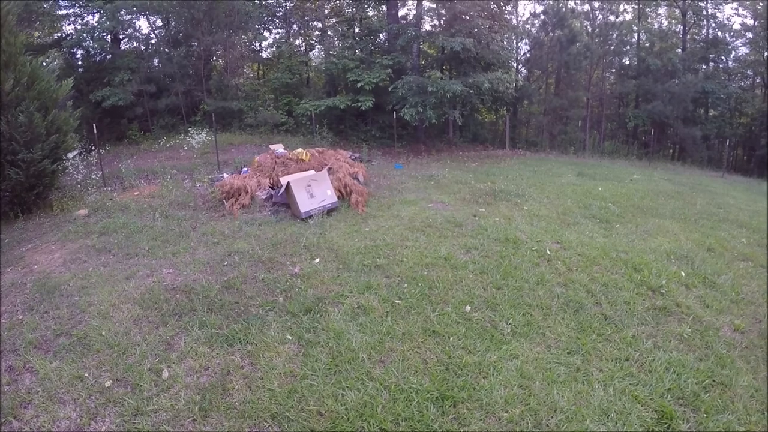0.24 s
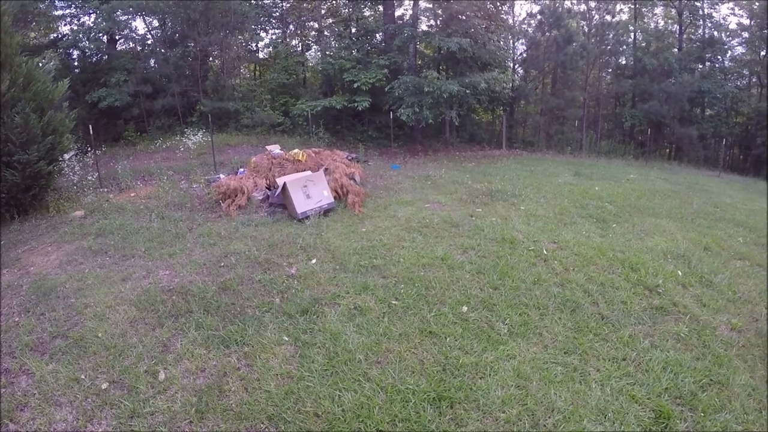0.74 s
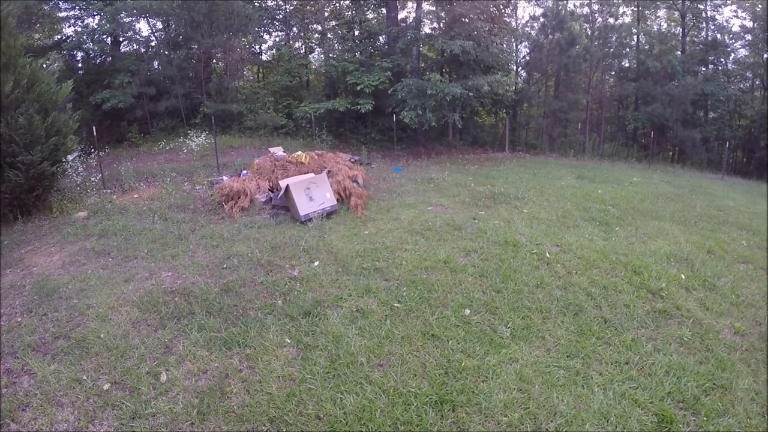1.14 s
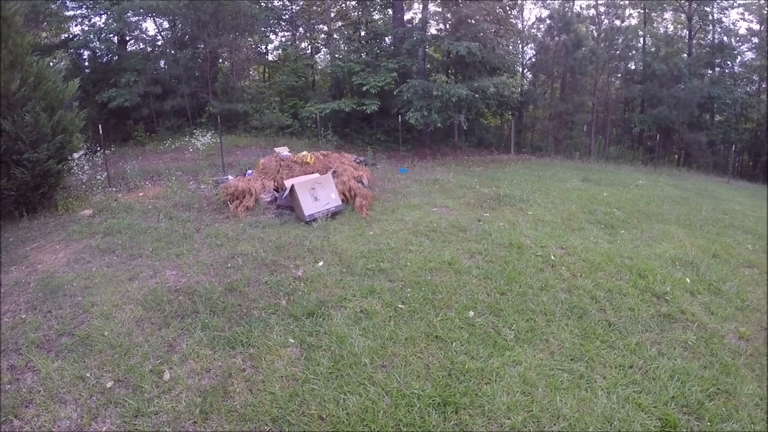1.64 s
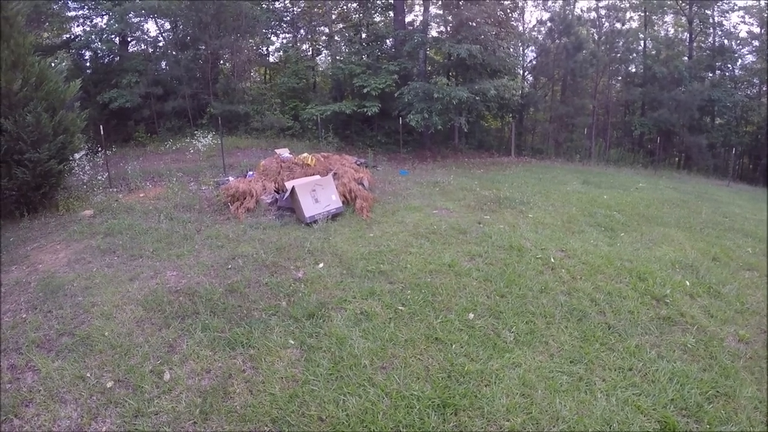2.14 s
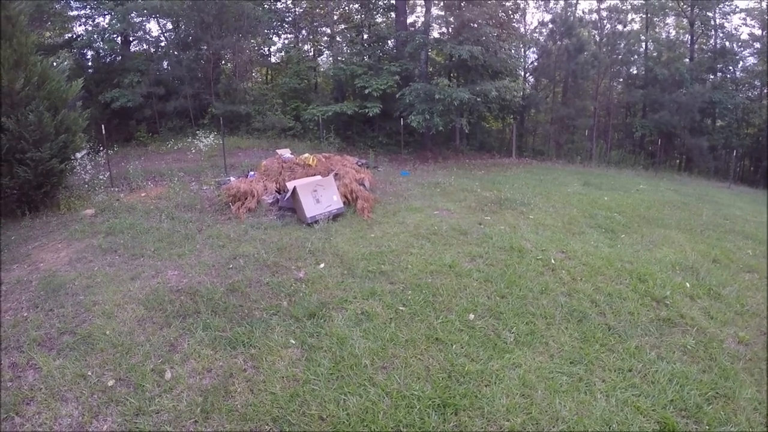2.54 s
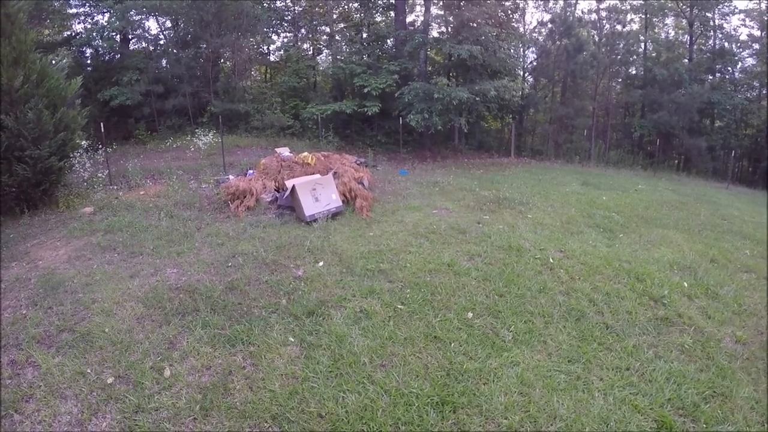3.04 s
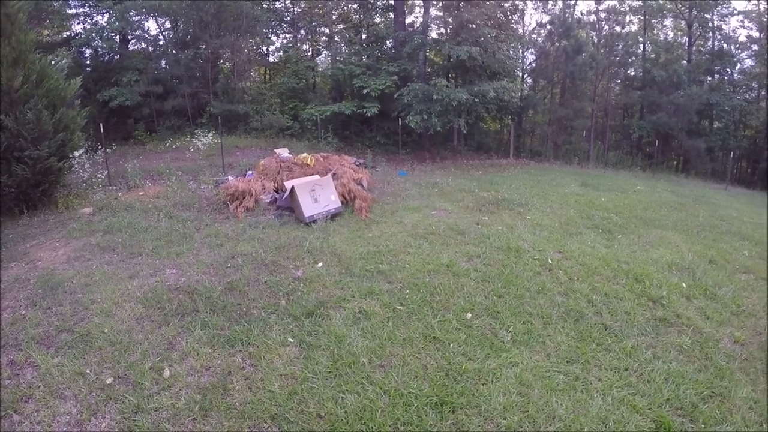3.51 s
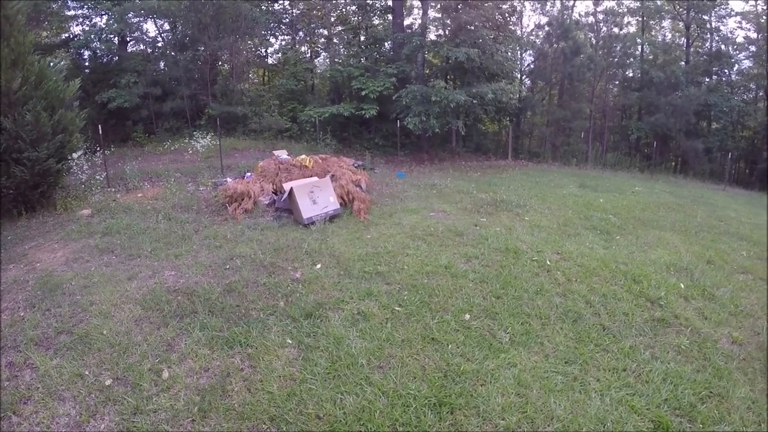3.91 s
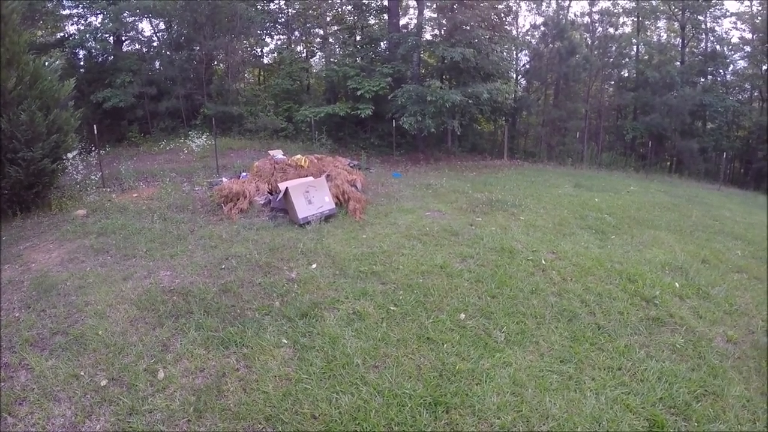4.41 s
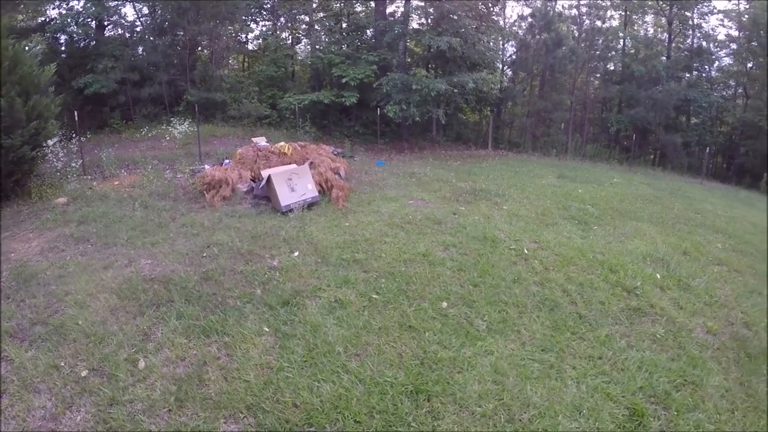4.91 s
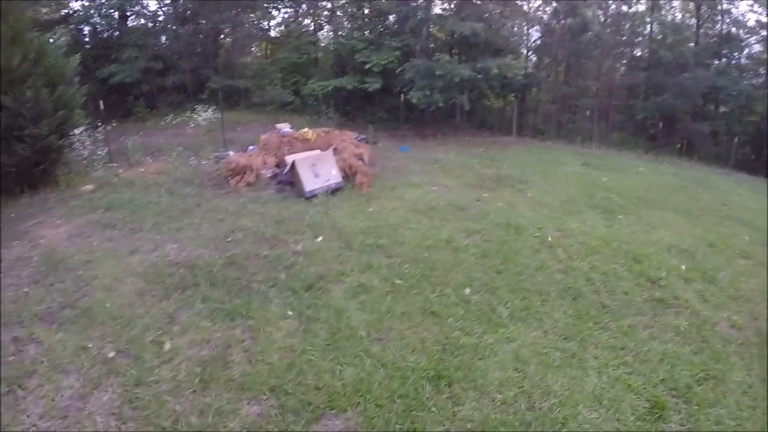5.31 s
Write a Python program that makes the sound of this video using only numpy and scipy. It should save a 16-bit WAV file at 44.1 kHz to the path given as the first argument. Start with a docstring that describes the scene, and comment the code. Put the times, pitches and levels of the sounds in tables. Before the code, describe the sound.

Three automatic airsoft bursts crack across a lawn, gears whirring and pellets smacking cardboard, ending in hollow dry firing.

```python
"""An electric airsoft rifle fires three automatic bursts, 13 shots a second, across a tree-edged lawn.
Its piston slams home with a crack; motor and gears whir between shots. Each pellet smacks a cardboard
target some 55 ms later and the trees scatter an echo. The last burst runs dry and ends in hollow pops
of air. Then the shooter's gear rustles while a far engine hums."""
import sys
import numpy as np
from scipy import signal
from scipy.fft import rfft, irfft, next_fast_len
from scipy.io import wavfile
from scipy.ndimage import uniform_filter1d

SR = 44100
rng = np.random.default_rng(int(sys.argv[2]) if len(sys.argv) > 2 else 0)


def unload_audio(sound):
    """Save the sound as a 16-bit wav file, at the path given as the first command line argument."""
    columns = np.transpose(np.atleast_2d(sound))
    # keep every value between -1 and 1, then stretch to whole-number steps
    steps = np.round(np.clip(columns, -1, 1) * 32767)
    wavfile.write(sys.argv[1], SR, steps.astype(np.int16))


N = 244843
TIME = np.arange(N) / SR
AGE = TIME[:8192]   # since a blow [s]
STEADY_SHOT_DB = 8.5   # reference stroke level

# gearbox shell modes: (frequency [Hz], width [Hz], level [dB])
GEARBOX_MODES = [(765, 350, -0.5), (1461, 260, -1), (1920, 480, -3.5), (2404, 200, -5), (3630, 93, 1.5),
                 (4580, 180, 2), (5130, 240, -19), (12640, 7700, -14.5)]
# (trigger pull [s], release [s], first shot [s], steady cycle [s], spin-up loss [s], jolt [dB])
BURSTS = [(0.169, 1.073, 0.2414, 0.0758, 0.0111, -26), (1.478, 2.488, 1.5601, 0.07633, 0.0055, -14.5),
          (2.892, 4.35, 2.9427, 0.07683, 0.0154, -31.5)]


def from_db(db):
    return 10 ** (np.asarray(db) / 20)


def unit_energy(x):
    return x / np.sqrt(np.sum(x ** 2) + 1e-20)


def unit_rms(x):
    return unit_energy(x) * np.sqrt(len(x))


def at_hz(points, hz):
    points_hz, values = np.transpose(points)
    return np.interp(np.log(hz + 1e-3), np.log(points_hz), values)


def add(track, at_s, sound, db=0):
    start = int(round(at_s * SR))
    track[start:start + len(sound)] += from_db(db) * sound[:N - start]


def colour(x, spectrum):
    """Minimum-phase filter following (frequency [Hz], level [dB]) points."""
    size = next_fast_len(len(x) + len(AGE), real=True)
    gain = from_db(at_hz(spectrum, np.arange(size // 2 + 1) * SR / size))
    cepstrum = irfft(np.log(gain), size)
    cepstrum[1:size // 2] *= 2
    cepstrum[size // 2 + 1:] = 0
    return irfft(rfft(x, size) * np.exp(rfft(cepstrum)), size)[:len(x)]


def resonate(x, modes, spread_db=0, detune=0):
    """Parallel resonators with optional random level and tuning; unit energy."""
    out = 0
    for hz, width_hz, db in modes:
        radius = np.exp(-np.pi * width_hz / SR)
        angle = 2 * np.pi * hz * (1 + detune * rng.normal()) / SR
        gain = from_db(db + spread_db * rng.normal()) * (1 - radius ** 2) / 2
        poles = [1, -2 * radius * np.cos(angle), radius ** 2]
        out += gain * signal.lfilter([1, 0, -1], poles, x + 1e-18)
    return unit_energy(out)


def decay(x, t60_s, rise_s):
    """Exponential rise and fall; unit energy."""
    return unit_energy(x * from_db(-60 * AGE / t60_s) * (1 - np.exp(-AGE / rise_s)))


def puff(t60_s, rise_s=1e-5):
    """Decaying noise."""
    return decay(rng.standard_normal(len(AGE)), t60_s, rise_s)


def ring(hz, t60_s, rise_s, glide=0, glide_s=0.004):
    """Decaying mode; starts sharp by the fraction glide."""
    phase = 2 * np.pi * hz * (AGE + glide * glide_s * (1 - np.exp(-AGE / glide_s)))
    return decay(np.sin(phase), t60_s, rise_s)


def snap(rough, t60_s):
    """Pressure spike with a brief splutter; unit energy."""
    return unit_energy((AGE == 0) + rough * puff(t60_s))


def drift(rate_hz):
    """Interpolated Gaussian noise."""
    return np.interp(TIME * rate_hz, np.arange(4096), rng.standard_normal(4096))


def strokes(burst, settle_cycles=0.5, coast_stretch=0.54, opening_db=7.5, opening_shots=1.93,
            misfeed_s=3.88, empty_from_s=4.0):
    """Piston strokes of a burst: (time [s], level [dB], barrel empty [0/1], extra cycle time [s])."""
    _, release_s, first_s, cycle_s, lost_s, _ = burst
    shot = np.arange(round((release_s - first_s) / cycle_s) + 1)
    still_to_lose_s = lost_s * np.exp(-shot / settle_cycles)
    at_s = first_s + shot * cycle_s + lost_s - still_to_lose_s
    at_s += coast_stretch * np.maximum(at_s - release_s, 0)
    empty = (at_s > empty_from_s) | (np.abs(at_s - misfeed_s) < cycle_s / 2)
    db = STEADY_SHOT_DB + opening_db * np.exp(-shot / opening_shots)
    return np.column_stack([at_s, db, empty, -np.diff(still_to_lose_s, append=0)])


def all_strokes():
    return np.vstack([strokes(burst) for burst in BURSTS])


def open_air(level_db=-51):
    """Steady low rumble of outdoor air."""
    # (frequency [Hz], level [dB])
    air_spectrum = [(12, -45.5), (20, -3), (88, -2), (113, -9.5), (234, -15.5), (377, -29.5), (642, -23.5),
                    (1260, -23.5), (1370, -27), (1860, -30), (2080, -31.5), (2750, -32), (4540, -36),
                    (16000, -53.5)]
    return from_db(level_db) * unit_rms(colour(rng.standard_normal(N), air_spectrum))


def far_engine(hum_hz=79.5, hum_gain_db=-1, road_gain_db=2, enter_s=4.1, fade_s=0.61):
    """Wavering engine hum and road noise swell in the distance."""
    # (time [s], relative hum [dB], relative road noise [dB])
    swell = [(4.5, -67, -83), (4.75, -47, -73), (5.086, -44.5, -55), (5.26, -39, -51.5), (5.35, -44, -51.5),
             (5.55, -44, -54)]
    # (frequency [Hz], level [dB])
    road_spectrum = [(76, -35.5), (130, -7), (444, -27), (554, -22), (1580, -23), (2830, -30.5),
                     (3130, -36), (3530, -31.5), (6600, -39), (13600, -49.5), (16000, -55)]
    at_s, hum_db, road_db = np.transpose(swell)
    phase = 2 * np.pi * np.cumsum(hum_hz * (1 + 0.0147 * drift(6.5))) / SR
    hum = unit_rms(np.sin(phase) + 0.12 * np.sin(2 * phase) + 0.04 * np.sin(3 * phase))
    hum *= from_db(np.interp(TIME, at_s, hum_db) + hum_gain_db + 2.6 * drift(25))
    road = unit_rms(colour(rng.standard_normal(N), road_spectrum))
    road *= from_db(np.interp(TIME, at_s, road_db) + road_gain_db)
    return np.clip((TIME - enter_s) / fade_s, 0, 1) * (hum + road)


def tree_echo(x, wet_db=-17, build_s=0.0065):
    """Trunks and leaves scatter back a soft tail, each band at its own decay rate."""
    # (frequency [Hz], level [dB])
    echo_spectrum = [(100, -17.5), (350, -10), (700, 0), (1050, -4), (2200, -3.5), (3500, -2), (5200, 1.5),
                     (7500, -1.5), (10000, -4.5), (15000, -10)]
    # (frequency [Hz], T60 [s])
    decay_times = [(200, 0.82), (800, 0.5), (2500, 0.74), (6000, 0.41), (15000, 0.66)]
    age_s, tail = TIME[:SR], 0
    edges_hz = np.geomspace(100, 16000, 9)
    for low, high in zip(edges_hz, edges_hz[1:]):
        band_pass = signal.butter(2, [low, high], "band", fs=SR, output="sos")
        band = signal.sosfilt(band_pass, rng.standard_normal(SR))
        tail += band * from_db(-60 * age_s / at_hz(decay_times, np.sqrt(low * high)))
    tail = unit_energy(tail * (1 - np.exp(-age_s / build_s)))
    return from_db(wet_db) * signal.fftconvolve(x, colour(tail, echo_spectrum))[:N]


def handling(catches_per_s=1500, mount_hz=48, mount_width_hz=35):
    """The shooter shifts: cloth rubs in uneven catches, gear knocks; the microphone mount rumbles, briefly as
    the third burst's first shot recoils, then as the shooter moves."""
    # clothing and sling: (time [s], length [s], level [dB])
    rubs = [(5.002, 0.0094, -52), (5.023, 0.046, -51.5), (5.087, 0.015, -52), (5.109, 0.011, -48.5),
            (5.274, 0.037, -45.5), (5.395, .01, -45.5), (5.507, .05, -47)]
    # (frequency [Hz], level [dB])
    cloth_spectrum = [(200, 0), (600, 4), (2000, 1.5), (4000, 3.5), (7000, -2), (11000, -6.5), (15000, -9)]
    # (time [s], tick [dB], tick [Hz], thud [dB], thud [Hz])
    gear_knocks = [(2.591, -13, 1080, -19, 90), (2.652, -12.5, 1240, -3.5, 57.3),
                   (4.447, -23, 1940, -25, 99.7), (5.251, -19.5, 3900, -16, 240),
                   (5.268, -21, 1800, -11.5, 240)]
    # (time [s], level [dB])
    rumble_levels = [(2.85, -73), (2.95, -42.5), (3.1, -48), (3.4, -70), (4.8, -69), (5.05, -49.5),
                     (5.27, -42.5), (5.4, -41), (5.55, -43)]
    rubbing, knocks = np.zeros((2, N))
    for at_s, length_s, db in rubs:
        rubbing += from_db(db) * ((TIME > at_s) & (TIME < at_s + length_s))
    catches = (rng.random(N) < catches_per_s / SR) + 0.2
    friction = catches * rng.standard_normal(N) * from_db(3.3 * drift(400))
    cloth = unit_rms(colour(friction, cloth_spectrum)) * uniform_filter1d(rubbing, size=256)
    for at_s, tick_db, tick_hz, thud_db, thud_hz in gear_knocks:
        add(knocks, at_s, resonate(snap(rough=0.9, t60_s=0.028), [(tick_hz, 450, 0)]), tick_db)
        add(knocks, at_s, ring(thud_hz, t60_s=8 / thud_hz, rise_s=0.0019), thud_db)
    mount = [(mount_hz, mount_width_hz, 0)]
    rumble = unit_rms(resonate(resonate(rng.standard_normal(N), mount), mount))
    return knocks + cloth + rumble * from_db(np.interp(TIME, *np.transpose(rumble_levels)))


def pellet_hit(crack_db, knock_db, panel_db, bend_db, box_db, bend_hz, box_hz, knock_hz=2920):
    """Pellet on cardboard: crack, hard knock, panel flutter with a sinking bending wave, box thump."""
    # cardboard skin: (frequency [Hz], width [Hz], level [dB])
    skin_modes = [(686, 97, -6), (1149, 160, 8.5), (1765, 303, 24), (2220, 640, 7.5), (3900, 270, 19),
                  (5440, 1400, 19.5), (8100, 2700, -5)]
    # (frequency [Hz], level [dB])
    flutter_spectrum = [(150, -2), (400, 0), (600, 0.5), (1200, -1.5), (1800, -1.5), (3000, -8.5),
                        (6000, -14.5), (15000, -30)]
    # (frequency [Hz], level [dB])
    panel_modes = [(540, -12.5), (830, -16.5), (1150, -11.5), (1720, -11)]
    crack = resonate(snap(rough=1.0, t60_s=0.0075), skin_modes, spread_db=0.7, detune=0.018)
    knock = ring(knock_hz * (1 + 0.022 * rng.normal()), t60_s=0.0079, rise_s=0.00007)
    contact = from_db(knock_db) * knock - crack
    panel = unit_energy(colour(puff(t60_s=0.053, rise_s=0.0004), flutter_spectrum))
    for hz, db in panel_modes:
        gain = from_db(db + 2 * rng.normal())
        panel += gain * ring(hz * (1 + 0.024 * rng.normal()), t60_s=0.041, rise_s=0.0084)
    gain = from_db(bend_db + 0.6 * rng.normal())
    panel += gain * ring(bend_hz * (1 + 0.022 * rng.normal()), t60_s=0.055, rise_s=0.0055, glide=0.26)
    thump_hz = box_hz * (1 + 0.051 * rng.normal())
    box = ring(thump_hz, t60_s=0.079, rise_s=0.0063)
    box += from_db(-5) * ring(1.5 * thump_hz, t60_s=0.06, rise_s=0.012)
    return from_db(crack_db) * contact + from_db(panel_db) * panel + from_db(box_db) * box


def target(round_trip_s=0.0545, panel_db=-0.75, opening_db=5.5, opening_shots=2.34):
    """Hits lag by pellet flight plus sound return; a burst's first hits sound louder."""
    # per burst: (crack [dB], knock re crack [dB], bend re panel [dB], box [dB], bend [Hz], box [Hz])
    aims = [(2.3, -7.5, -2, -6.5, 1180, 220.3), (4, -5, -5.5, -5, 640, 189), (5, -9, -8.5, -5.5, 651, 180)]
    # hits that sound duller, boomier or more ringing than usual:
    # (time [s], crack change [dB], panel change [dB], box change [dB], bend [Hz])
    odd_hits = [(0.459, 0, 2, 0, 1150), (0.535, -5.5, 1.5, -1, 547), (1.067, -8.5, 3.5, -3.5, 1610),
                (1.148, 1.5, 4.5, -8, 1054), (1.85, 0, 7, 2, 825), (2.385, -9, -2, -3, 1950),
                (2.46, -4.5, 1.5, 8, 438), (2.536, -1.5, 2.5, 6, 627), (3.166, -5, 2.5, 0, 1000),
                (3.395, -5.5, -1.5, -4, 1770)]
    out = np.zeros(N)
    for burst, (crack_db, knock_db, bend_db, box_db, usual_hz, box_hz) in zip(BURSTS, aims):
        for shot, (fired_s, _, empty, _) in enumerate(strokes(burst)):
            if empty:
                continue
            at_s = fired_s + round_trip_s
            matches = (odd[1:] for odd in odd_hits if abs(odd[0] - at_s) < 0.02)
            *change_db, bend_hz = next(matches, (0, 0, 0, usual_hz))
            loudness_db = opening_db * np.exp(-shot / opening_shots) + rng.standard_normal(3)
            crack, panel, box = loudness_db + change_db + [crack_db, panel_db, box_db]
            add(out, at_s, pellet_hit(crack, knock_db, panel, bend_db, box, bend_hz, box_hz))
    return out


def motor(level_db=-43.5, whine_db=-5, mesh_hz=2440, spin_up_s=0.026, grip_s=0.018, coast_s=0.014,
          sag=0.055, sag_lag_cycles=0.05, opening_peak_s=0.048, opening_width_s=0.077):
    """Gears jolt, grind and whine; the motor slows as it compresses the spring each cycle."""
    running, speed, jolts = np.zeros((3, N))
    for pull_s, release_s, *_, jolt_db in BURSTS:
        held_s = np.maximum(TIME - pull_s, 0)
        coasting = np.exp(-np.maximum(TIME - release_s, 0) / coast_s)
        # the whir is louder as each burst starts
        opening_db = 4 * np.exp(-((held_s - opening_peak_s) / opening_width_s) ** 2)
        running += from_db(level_db + opening_db) * (1 - np.exp(-held_s / grip_s)) * coasting
        speed += (1 - np.exp(-held_s / spin_up_s)) * coasting
        add(jolts, pull_s, resonate(puff(t60_s=0.029), GEARBOX_MODES), jolt_db)
    fired_s = all_strokes()[:, 0]
    cycle = np.interp(TIME, fired_s, np.arange(len(fired_s)))
    speed *= 1 + sag * np.sin(2 * np.pi * (cycle - sag_lag_cycles)) + 0.007 * drift(200)
    phase = 2 * np.pi * np.cumsum(mesh_hz * speed) / SR
    singing = np.minimum(speed / 0.9, 1) ** 10   # teeth sing only near full speed
    whine = from_db(whine_db) * singing * (np.sin(phase) + 0.5 * np.sin(2 * phase))
    grind = unit_rms(resonate(rng.standard_normal(N), GEARBOX_MODES))
    return jolts + running * (grind + whine) * from_db(2 * drift(380))


def muzzle_beam(gain_db=-2, empty_db=-3):
    """Bright crack radiated forward, heard only via the trees."""
    out = np.zeros(N)
    for at_s, db, empty, _ in all_strokes():
        add(out, at_s, snap(rough=0.61, t60_s=0.0024), db + gain_db + empty_db * empty)
    return out


def rifle(rush_s=0.0034, ground_s=0.0042, latch_s=0.0225, crack_gain_db=1, crack_spread_db=2):
    """The piston rushes forward and slams home; the lawn scatters the crack; the gears catch again."""
    # (frequency [Hz], width [Hz], level [dB])
    muzzle_modes = [(155, 320, 1.5), (497, 236, 5.5), (1310, 620, -1), (1657, 380, 8), (2243, 510, 12.5),
                    (3530, 370, 11.5), (4840, 640, 10.5), (5350, 620, 16), (5855, 410, 12.5),
                    (7900, 1400, 8.5), (10250, 2000, 6), (14000, 2500, -3.5)]
    # (frequency [Hz], width [Hz], level [dB])
    empty_barrel_modes = [(212, 170, 3.5), (474, 34, 12.5), (682, 66, 23.5), (980, 99, 17.5),
                          (1686, 51, 14), (2220, 330, 14), (3350, 260, 14.5), (4800, 520, 16.5),
                          (8100, 2200, -2)]
    # sector gear on piston rack: (frequency [Hz], width [Hz], level [dB])
    latch_modes = [(2120, 390, 2.5), (4490, 190, 2), (5300, 170, -15.5)]
    # (frequency [Hz], level [dB])
    ground_spectrum = [(80, 0), (240, 15), (420, -2), (700, 12), (1000, 1), (1600, 7.5), (2900, -3),
                       (3800, 8), (6000, -2), (9500, -0.5), (15000, -28.5)]
    out = np.zeros(N)
    loose_parts = puff(t60_s=0.063)   # same on every empty stroke
    pop = resonate(snap(rough=0.32, t60_s=0.017), empty_barrel_modes)
    for at_s, db, empty, extra_s in all_strokes():
        rush = puff(t60_s=0.024)[:int(rush_s * SR)][::-1]
        add(out, at_s - rush_s, resonate(rush, GEARBOX_MODES), db=-9.5 + 8.5 * empty)
        crack = resonate(snap(rough=0.38, t60_s=0.0049), muzzle_modes, spread_db=0.8, detune=0.008)
        add(out, at_s, crack, db + crack_gain_db - 7 * empty + crack_spread_db * rng.normal())
        scatter = colour(puff(t60_s=0.028), ground_spectrum)
        add(out, at_s + ground_s, scatter, db=-2.5 + 0.93 * (db - STEADY_SHOT_DB) - empty)
        latch = resonate(snap(rough=1.5, t60_s=0.023), latch_modes, spread_db=6.5)
        slow = extra_s > 0.003   # a slow first cycle catches later and harder
        add(out, at_s + latch_s + 0.42 * extra_s, latch, db=-12 + 5 * slow - 4 * empty)
        if empty:   # no pellet: air pops out, the uncushioned piston shakes the shell
            add(out, at_s, pop, db=2)
            rattle = resonate(loose_parts + 0.45 * puff(t60_s=0.066), GEARBOX_MODES)
            add(out, at_s, rattle, db=-3.3)
    return out


def scene(gun_send_db=-6, target_send_db=1):
    """Mono mix; the far target excites the trees more than the gun's body does."""
    gun, hits = rifle() + motor(), target()
    echo = tree_echo(muzzle_beam() + from_db(gun_send_db) * gun + from_db(target_send_db) * hits)
    return (gun + hits + echo + handling() + far_engine() + open_air())[None]


def record(dry, ceiling=1.1, rolloff_hz=13500, cutoff_hz=15450):
    """Microphone: soft overload on the loudest cracks, treble roll-off, steep top cut."""
    rolloff = signal.butter(2, rolloff_hz, fs=SR, output="sos")
    top_cut = signal.ellip(10, 0.1, 70, cutoff_hz, fs=SR, output="sos")
    return signal.sosfilt(np.vstack([rolloff, top_cut]), ceiling * np.tanh(dry / ceiling))


dry = scene()
out = record(dry)
unload_audio(out)
```